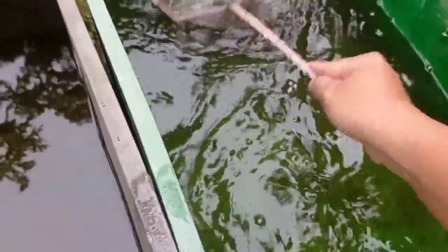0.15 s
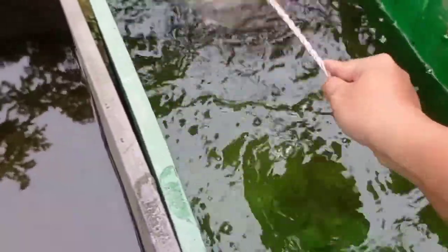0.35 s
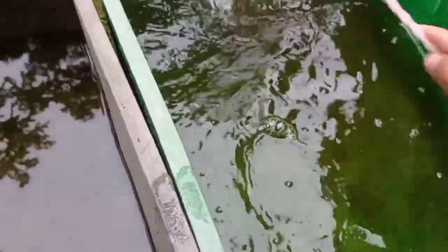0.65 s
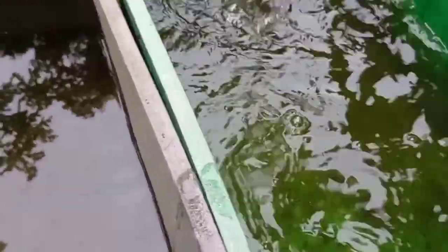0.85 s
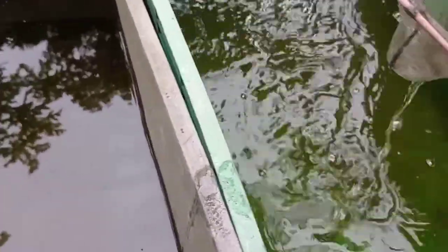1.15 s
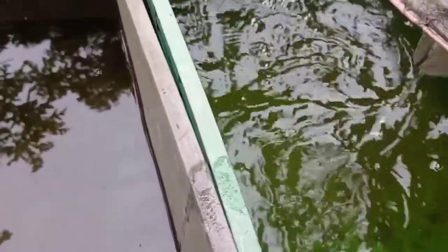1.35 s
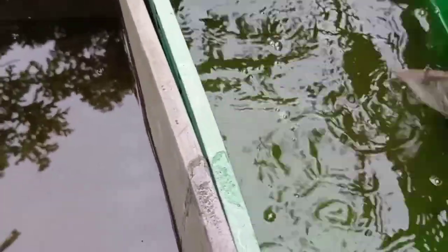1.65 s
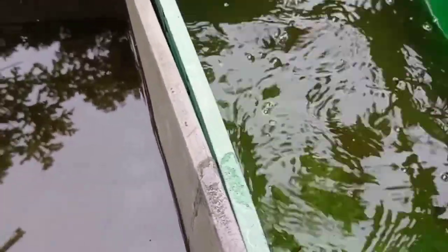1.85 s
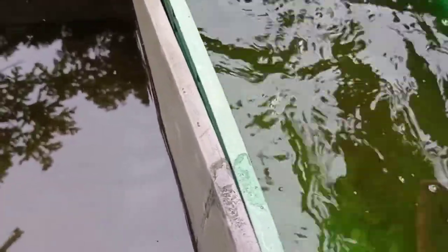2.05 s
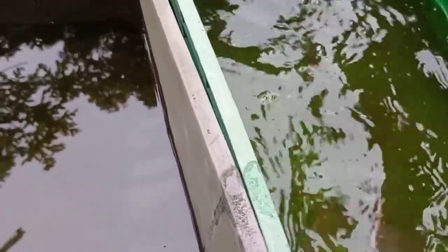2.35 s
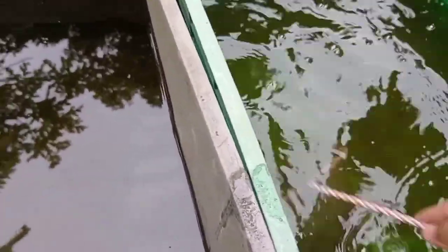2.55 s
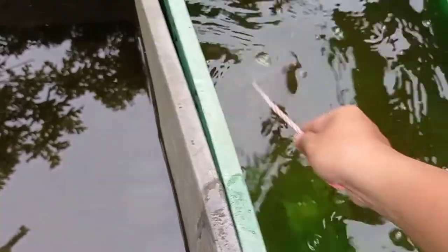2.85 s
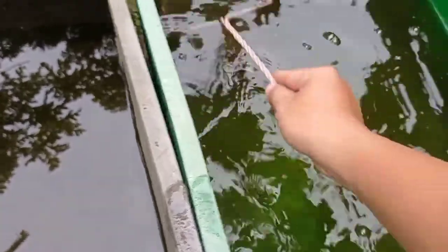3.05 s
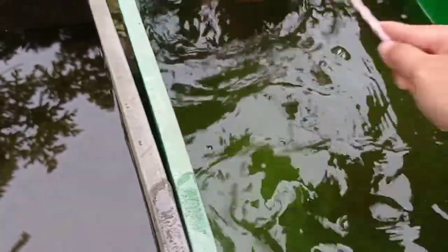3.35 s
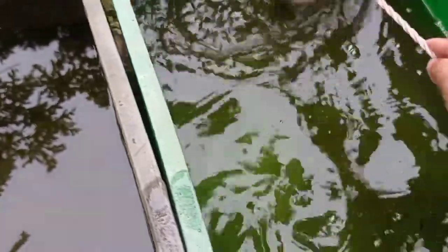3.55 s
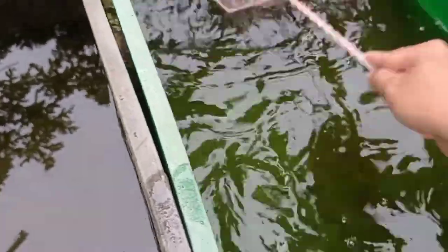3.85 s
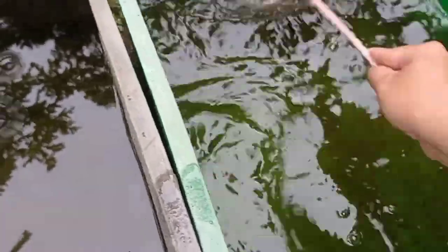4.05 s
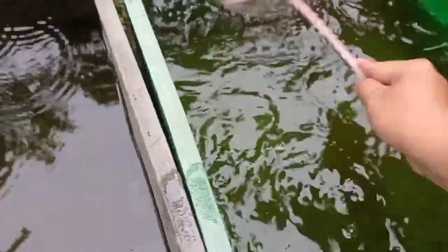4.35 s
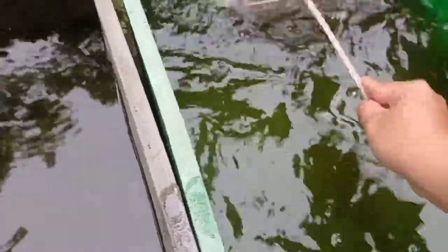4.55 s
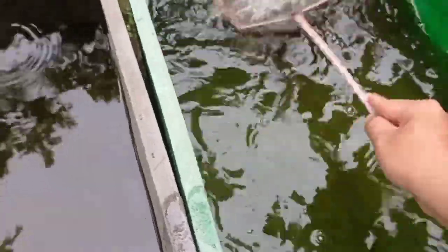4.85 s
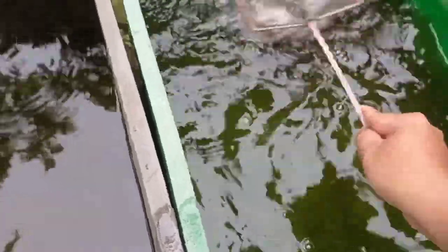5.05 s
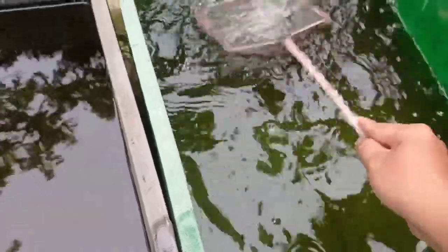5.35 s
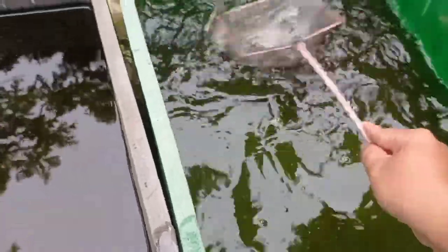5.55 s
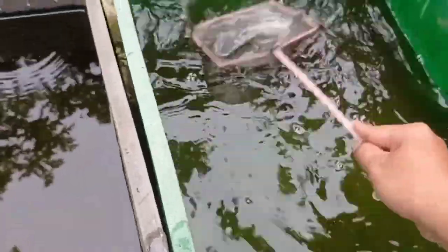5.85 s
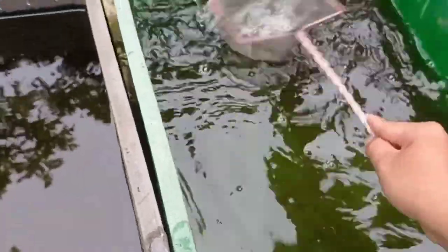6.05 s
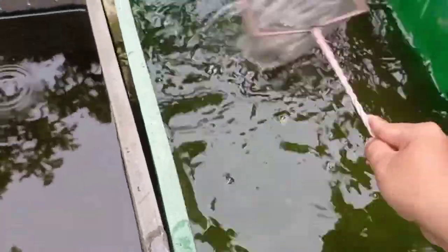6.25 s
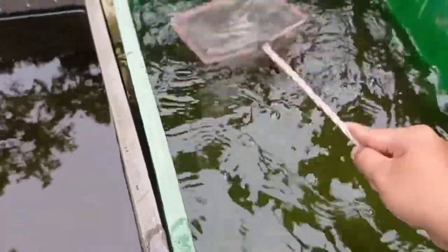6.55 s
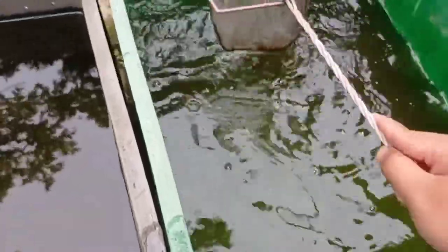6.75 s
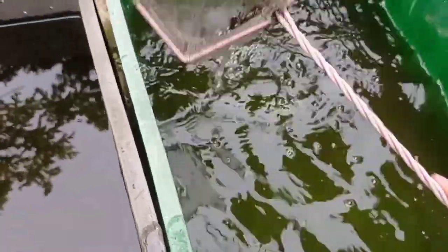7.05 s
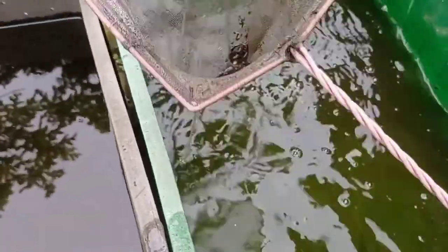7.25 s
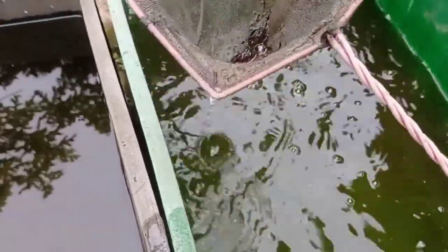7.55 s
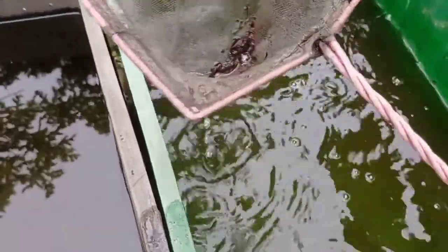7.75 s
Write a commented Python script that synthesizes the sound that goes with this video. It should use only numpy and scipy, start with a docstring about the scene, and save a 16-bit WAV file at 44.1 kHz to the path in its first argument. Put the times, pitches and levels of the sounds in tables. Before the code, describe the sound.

Close mono perspective at an outdoor water tank, with short wall echoes, a very faint open-air tail, and a low wavering machine hum throughout, slightly stronger later. From 0.15 to 0.6 seconds a hand net is shaken in quick, bright splashes with bubbly churn, easing into a soft swish near 0.7. A smaller splash at 1.0 leaves scattered high plinks and drips until 1.6. At 1.8 a deep hollow plop comes with a little splash, another plop near 2.07, then dark, soft slosh as the net slides under until 2.9. Low bloops at 3.0 lead to a near-calm with a thin swell of hiss. From 3.7 to 6.7 vigorous shaking makes about six splashes a second, spray fizzing over gurgling bubbles. It stops quickly; ticks and trickle thin out, with clear drips around 7.2, 7.4 and 7.55 and a rounded plink at 7.85.

```python
"""Hand net in an outdoor tank

At a water tank outdoors, close perspective, mono microphone: a hand net is swished, dipped again, shaken
about six times a second and lifted out. Noise and ringing grains make the spray and splashes; bubbles with
climbing pitch make the churn and plinking drops; bubbles in noise make the slosh, bands of noise the swishes.
Short echoes and a faint outdoor tail follow, over a low machine hum and a faint hiss that swells once.
"""
import sys
import numpy as np
from scipy import signal
from scipy.fft import rfft, irfft, next_fast_len
from scipy.io import wavfile
from scipy.ndimage import map_coordinates

SR = 44100
rng = np.random.default_rng(int(sys.argv[2]) if len(sys.argv) > 2 else 0)


def unload_wav(signal):
    """Save mono or channel-first audio to the path in sys.argv[1] as 16-bit WAV at rate SR, clipped to [-1, 1]."""
    wavfile.write(
        sys.argv[1],
        SR,
        np.round(np.clip(np.atleast_2d(signal).T, -1, 1) * 32767).astype(np.int16),
    )


N = 349272
TIME = np.arange(N) / SR
CUTOFF_HZ = 15700

# Slow swell of the machine hum: (time [s], relative level [dB])
HUM_SWELL = [(0.0, -52.5), (0.77, -53.5), (3.4, -51), (3.93, -49), (5.45, -49), (6.51, -46.5), (7.92, -47)]
# Colours of the layers, each: (frequency [Hz], relative gain [dB])
HUM_COLOUR = [(25, -28), (45, -20.5), (60, -10.5), (80, -1), (110, 2.5), (150, -1), (185, -2), (220, -1),
              (265, -12), (320, -15), (370, -13.5), (420, -17.5), (475, -26), (560, -28), (680, -31.5),
              (900, -32.5), (1150, -40.5), (1600, -39.5), (2200, -47.5), (4000, -75)]
HISS_COLOUR = [(400, -6), (900, 1), (1300, -11), (2200, 1), (2900, 2), (3500, 4.5), (4100, -6), (5600, 7),
               (7500, 4), (9500, -9), (11500, -25), (13500, -27), (15300, -10), (16000, -42)]
SPRAY_COLOUR = [(710, -8.5), (1200, -4), (1430, -10), (1570, 1), (1930, -5), (2830, 2), (3220, -1),
                (3950, -2.5), (5470, -5.5), (6440, -0.5), (11900, -27), (13600, -32), (15000, -15),
                (16000, -47)]
CHURN_COLOUR = [(350, -33), (550, -4.5), (800, 2.5), (1100, -1), (1600, -0.5), (2400, 3), (3500, -53)]
SLOSH_COLOUR = [(200, 1), (320, 7), (550, -7), (850, 2.5), (1300, -5.5), (1900, -5.5), (2500, -10),
                (3000, -9.5), (4000, -14), (6800, -21), (9000, -31), (13000, -54)]
HISS_SWELL_COLOUR = [(1200, -56), (2200, -2), (3000, -21), (4200, 1), (5000, 5), (5300, -5), (5750, 10),
                     (6500, 2.5), (8500, -10), (12000, -25), (16000, -26)]
# Droning tones within the hum: (frequency [Hz], waver rate [1/s], level against the rumble [dB])
DRONES = [(123.6, 7, -6.5), (144.8, 5, -8), (161, 5, -8.5), (191.6, 9, -8), (293, 5, -21.5),
          (335, 6, -25.5), (402.7, 7, -23.5)]
# Faint hiss behind everything: (time [s], level [dB])
HISS_COURSE = [(0, -85), (0.06, -63), (0.14, -65), (1.2, -69.5), (1.55, -74.5), (1.7, -72), (1.9, -73),
               (2.03, -71), (2.3, -75.5), (2.8, -75.5), (3.05, -65.5), (3.28, -78), (3.5, -68.5),
               (3.65, -66.5), (6.9, -72), (7.3, -74), (7.75, -80)]
# Sheets of water thrown by the net:
# (time of crest [s], relative level [dB], swell [s], fall [s], pitch of the commonest drops [Hz])
SHEETS = [(0.138, -40.5, 0.0064, 0.0079, 7600), (0.211, -61, 0.0043, 0.018, 2600),
          (0.292, -28, 0.0031, 0.0094, 8000), (0.36, -36, .0034, 0.017, 6640),
          (0.456, -28, 0.011, 0.012, 4520), (0.923, -47, 0.016, 0.021, 2020),
          (1.016, -47.5, 0.02, 0.0098, 3180), (1.039, -34.5, 0.0024, 0.0075, 5200),
          (1.802, -41.5, 0.0078, .008, 5800), (1.818, -40.5, 0.0084, 0.0078, 4240),
          (1.902, -50, 0.00068, 0.012, 3300), (2.46, -50.5, 0.024, 0.046, 5300),
          (3.408, -54, 0.013, 0.023, 7140), (3.73, -35.5, 0.013, 0.0093, 6600),
          (3.773, -40.5, 0.0046, 0.011, 2900), (3.823, -34.5, 0.0012, 0.014, 4900),
          (4.005, -28, 0.007, 0.0051, 5360), (4.126, -39.5, 0.0025, 0.052, 2870),
          (4.311, -35, 0.0026, 0.023, 3880), (4.385, -29.5, 0.0027, 0.0012, 4600),
          (4.48, -36, 0.029, 0.0038, 3000), (4.58, -37.5, 0.0086, 0.0068, 3070),
          (4.638, -31.5, 0.017, 0.0079, 4700), (4.805, -26, 0.0044, 0.0037, 5830),
          (4.957, -32, 0.02, 0.024, 4650), (5.138, -30.5, 0.0024, 0.0023, 3730),
          (5.214, -70, 0.0027, .005, 2400), (5.3, -33.5, 0.0031, 0.006, 5630),
          (5.405, -34, 0.0022, .013, 5240), (5.482, -27, 0.0065, 0.0048, 6900),
          (5.592, -37.5, 0.023, 0.018, 2300), (5.646, -31, 0.0069, 0.016, 5060),
          (5.763, -34.5, 0.003, 0.0044, 3200), (5.833, -27, 0.003, 0.0067, 5170),
          (5.992, -27.5, 0.004, 0.011, 5500), (6.065, -45, 0.013, 0.042, 3200),
          (6.173, -39, .011, 0.013, 6040), (6.259, -44, 0.027, 0.014, 1750),
          (6.346, -34, 0.012, 0.0036, 4860), (6.437, -48, 0.011, .012, 3220),
          (6.512, -37.5, 0.014, 0.017, 5370), (6.611, -46, 0.023, 0.02, 2380),
          (6.681, -36, 0.014, 0.021, 5900)]
# Bouts of shaking: (start [s], end [s], relative spray level [dB], relative churn level [dB], churn decay [dB/s])
BOUTS = [(0.145, 0.604, -58, -58.5, 36.5), (3.828, 6.735, -58, -58.5, 42)]
# The loudest drops and their bubbles: (time [s], peak level [dB], pitch [Hz], ring [s], slap level [dB])
LOUD_DROPS = [(0.288, -37, 1050, 0.0032, -36), (0.289, -39.5, 1820, 0.0027, -45),
              (0.318, -39, 2980, 0.0049, -52), (0.354, -39, 2300, 0.003, -40),
              (0.383, -36, 1670, 0.0033, -43), (0.469, -39, 1895, 0.0069, -46),
              (0.514, -37.5, 838, 0.017, -39), (0.514, -40.5, 1340, 0.0061, -38),
              (0.992, -46, 4270, .004, -65), (1.008, -49, 1506, 0.024, -35),
              (1.034, -45.5, 1280, 0.0037, -34), (1.04, -41, 4040, .002, -36),
              (1.074, -49, 2660, 0.0063, -56), (1.1, -36, 5700, 0.0013, -63), (1.088, -51, 3490, .005, -57),
              (1.119, -51, 7300, .003, -53), (1.159, -55, 2630, 0.0025, -58),
              (1.143, -30, 6280, 0.0012, -66), (1.168, -49, 3700, 0.0049, -59),
              (1.256, -50, 10200, 0.0012, -60), (1.272, -80, 6000, 0.0062, -33),
              (1.308, -52, 2090, 0.0053, -53), (1.313, -41, 2160, 0.0071, -31),
              (1.32, -47, 8100, .0015, -58), (1.342, -50, 4100, 0.011, -41), (1.36, -41, 6330, 0.0044, -50),
              (1.412, -41.5, 1037, 0.0066, -42), (1.414, -43, 1450, 0.0048, -61),
              (1.403, -51, 7600, .0015, -64), (1.432, -56, 7400, .002, -48), (1.461, -46, 5120, .002, -56),
              (1.465, -48, 7000, .002, -40), (1.465, -44, 2260, 0.006, -42),
              (1.49, -38.5, 2770, 0.0048, -49), (1.512, -56, 2300, 0.005, -58),
              (1.556, -45, 5280, 0.003, -62), (1.577, -45.5, 5430, 0.0035, -69),
              (1.795, -45, 3420, 0.0026, -39), (1.82, -29.5, 855, 0.0045, -55),
              (1.8212, -19.5, 244, 0.006, -50), (1.83, -21.5, 188, 0.015, -48),
              (1.838, -48, 4150, .003, -62), (1.852, -41, 192, 0.017, -58), (1.902, -43, 2960, 0.0035, -48),
              (1.945, -53.5, 3250, .005, -49), (1.961, -57, 3700, 0.0018, -61),
              (1.968, -53, 5800, 0.0018, -67), (1.934, -42.5, 654, 0.0056, -62),
              (1.937, -37, 293, 0.007, -29), (2.06, -43, 3080, 0.0035, -55),
              (2.064, -33, 2130, 0.0025, -38), (2.066, -29, 870, 0.0044, -46),
              (2.067, -37, 279, 0.018, -39), (2.099, -45, 2310, 0.012, -53), (2.365, -50, 890, 0.0035, -46),
              (2.366, -51, 2000, .004, -52), (2.825, -43, 301, 0.016, -70), (2.856, -40, 314, 0.016, -47),
              (3.003, -24, 169.5, 0.0025, -66), (3.018, -27, 234, 0.0028, -52),
              (3.643, -41, 6540, 0.0011, -69), (3.669, -49, 7750, 0.0033, -55),
              (3.726, -35, 6560, 0.0061, -59), (3.728, -51, 945, 0.0083, -52),
              (3.753, -48, 936, 0.016, -31), (3.769, -39.5, 917, 0.011, -28),
              (3.819, -33.5, 5180, 0.0013, -31), (3.827, -41.5, 2525, 0.02, -27),
              (3.878, -33.5, 1146, 0.0079, -33), (3.934, -52, 1050, .005, -31),
              (3.994, -38.5, 930, 0.0093, -51), (4.01, -39, 2100, .005, -55), (4.051, -41, 2680, .005, -57),
              (4.12, -41.5, 980, 0.0086, -29), (4.175, -42, 1020, 0.0038, -33),
              (4.207, -42.5, 817, 0.016, -53), (4.234, -46, 970, 0.0097, -52),
              (4.359, -44, 824, 0.013, -32), (4.395, -39.5, 1244, 0.018, -37),
              (4.432, -35.5, 2750, 0.0044, -36), (4.651, -18.5, 2660, 0.00044, -43),
              (4.695, -41, 1670, 0.0058, -64), (4.804, -24, 5460, .0012, -54),
              (4.862, -45, 740, 0.0072, -56), (4.937, -31.5, 1900, 0.0024, -32),
              (5.043, -31.5, 737, 0.0025, -30), (5.066, -53, 930, .006, -28),
              (5.419, -42, 3300, 0.0043, -40), (5.709, -31.5, 1080, 0.0042, -38),
              (5.836, -39, 1530, 0.0053, -58), (6.673, -35, 1520, 0.0043, -28.5),
              (6.674, -42.5, 960, 0.0055, -53), (7.168, -43, 2300, 0.005, -57),
              (7.184, -44.5, 1525, 0.0067, -47), (7.218, -49.5, 6420, 0.0042, -71),
              (7.244, -42.5, 1110, 0.0075, -62), (7.256, -37, 3020, 0.0021, -55),
              (7.4, -36.5, 2920, 0.0057, -47), (7.428, -54, 3460, 0.0037, -47),
              (7.548, -32, 3160, 0.0018, -62), (7.548, -34.5, 2110, 0.0028, -27.5),
              (7.561, -35.5, 823, 0.0055, -36), (7.562, -42, 3200, 0.0017, -46),
              (7.586, -57, 1500, 0.0064, -40), (7.637, -43.5, 3200, 0.002, -65),
              (7.641, -54, 4200, 0.0032, -63), (7.847, -27.5, 871, 0.026, -64),
              (7.848, -50, 4900, 0.003, -64), (7.864, -53.5, 6350, 0.0041, -71)]
# Pushes of the net under the surface: (time of crest [s], relative level [dB], swell [s], fall [s])
NET_PUSHES = [(0.39, -52, 0.012, 0.019), (1.04, -53, 0.0023, 0.013), (1.941, -71, 0.0036, 0.016),
              (2.075, -71, 0.0045, 0.035), (2.165, -48.5, 0.024, 0.01), (2.362, -50, 0.0012, 0.054),
              (2.5, -47, 0.041, 0.045), (2.728, -50, 0.059, 0.068), (2.86, -54.5, 0.058, 0.037),
              (2.913, -55.5, 0.0043, 0.015)]
# Soft swishes and faint narrow bands of hiss:
# (time of crest [s], level [dB], swell [s], fall [s], centre pitch [Hz], width [octaves])
NOISE_BANDS = [(0.546, -56, .012, .018, 1120, 0.49), (0.689, -52.5, .066, 0.042, 1050, 0.43),
               (0.83, -57, .012, 0.0098, 980, 0.45), (1.759, -76.5, 0.044, 0.018, 2320, .1),
               (1.811, -60, .0042, .03, 1480, 0.71), (1.85, -65, .01, .03, 2780, 0.28),
               (1.912, -65, 0.021, .012, 1520, .25), (1.993, -64, .005, 0.015, 5300, 0.29),
               (2.026, -70, 0.0076, 0.022, 3620, 0.14), (2.09, -60, .01, 0.02, 880, 0.62),
               (2.2, -69.5, .12, 0.075, 3640, .1), (2.22, -79, .06, 0.073, 5100, 0.1),
               (2.462, -41, 0.0012, 0.004, 5700, 0.52), (2.5, -67, .035, .03, 1780, 0.51),
               (2.615, -57.5, 0.0065, 0.025, 2650, 0.66), (2.683, -50.5, 0.018, 0.017, 3100, 0.43),
               (2.914, -68.5, 0.0055, 0.0061, 4900, 0.14), (3.05, -67, 0.12, 0.099, 2220, 0.17),
               (3.08, -72.5, .08, 0.11, 1230, .3), (3.082, -75, 0.043, 0.077, 3600, 0.44),
               (3.25, -85, 0.11, 0.13, 5040, .05), (3.3, -74, .12, 0.18, 5860, .09),
               (3.369, -75, 0.012, 0.026, 2900, 0.15), (3.4, -70, 0.023, .1, 2200, .4),
               (3.44, -68, .025, 0.12, 950, 0.54), (3.58, -67, .02, 0.056, 915, 0.42),
               (3.95, -53.5, 0.054, 0.071, 960, 0.61), (4.2, -58, 0.045, 0.031, 950, 0.44)]


def from_db(db):
    """Decibels to gain."""
    return 10 ** (np.asarray(db) / 20)


def rms_one(x):
    """Scale to unit rms."""
    return x / np.sqrt(np.mean(x ** 2) + 1e-20)


def at_hz(points, hz):
    """Gain of a colour at the given frequencies, interpolated over log frequency."""
    points = np.array(points)
    return from_db(np.interp(np.log(hz + 1e-9), np.log(points[:, 0]), points[:, 1]))


def coloured(x, colour):
    """Filter a steady texture by a colour; rms 1."""
    size = next_fast_len(N)
    gain = at_hz(colour, np.fft.rfftfreq(size, 1 / SR))
    return rms_one(irfft(rfft(x, size) * gain, size)[:N])


def band(x, low_hz, high_hz):
    """Gentle band-pass, kept below the cutoff."""
    high_hz = min(high_hz, CUTOFF_HZ)
    edges = [min(low_hz, high_hz / 2 ** .5), high_hz]
    return signal.sosfilt(signal.butter(2, edges, "band", fs=SR, output="sos"), x)


def drift(rate):
    """Random wavering of rms 1, with `rate` new values a second."""
    knots = rng.standard_normal(4000)
    return rms_one(np.interp(TIME * rate, np.arange(len(knots)), knots))


def add(out, s, sound):
    """Mix a short sound in at time s."""
    at = int(np.clip(round(s * SR), 0, N - 1))
    out[at:at + len(sound)] += sound[:N - at]


def crest(t, swell_s, fall_s):
    """An envelope that swells to 1 at t = 0 and falls away."""
    return np.exp(-np.abs(t) / np.where(t < 0, swell_s, fall_s))


def held(start_s, end_s, rise_s, fade_db_per_s):
    """An envelope that rises up to the start, holds to the end, and fades."""
    rise = np.exp(np.minimum(TIME - start_s, 0) / rise_s)
    return rise * from_db(-fade_db_per_s * np.maximum(TIME - end_s, 0))


def bubble(hz, ring_s, glide, speedup=3.94, burst_octaves=0.85):
    """A trapped air bubble rings; its pitch climbs ever faster as it nears the surface, where it bursts."""
    t = np.arange(int(3.5 * ring_s * SR) + 2) / SR
    climb = np.minimum(glide * t * (1 + speedup * glide * t), 2)  # octaves
    cycles = np.cumsum(np.minimum(hz * 2 ** climb, CUTOFF_HZ)) / SR
    onset = np.minimum(2 * cycles, 1)
    alive = np.exp(-(climb / burst_octaves) ** 8)
    return np.sin(2 * np.pi * cycles) * onset * np.exp(-t / ring_s) * alive


def bubble_cloud(low_hz, high_hz, cycles, rise, spread_db, count):
    """Bubbles of many sizes, born at random; each climbs in pitch while it rings, by `rise` octaves or so."""
    out = np.zeros(N)
    for when, radius, strength, damping, depth in rng.random((count, 5)):
        hz = low_hz * (high_hz / low_hz) ** radius
        ring_s = cycles * (.5 + damping) / hz
        size_db = spread_db * min(-np.log(1 - strength), 3)
        ring = bubble(hz, ring_s, 2 * depth * rise / ring_s)
        add(out, when * N / SR, hz * from_db(size_db) * ring)
    return rms_one(out)


def droplets(per_s, spread_db, cycles, count=26):
    """Countless tiny drops of uneven size, each ringing a few cycles at one of `count` pitches."""
    sizes = from_db(spread_db * np.minimum(rng.exponential(1, N), 4)) * rng.choice([-1, 1], N)
    clicks = sizes * (rng.random(N) < per_s / SR)
    dealt, out = rng.integers(0, count, N), np.zeros(N)
    for k, hz in enumerate(np.geomspace(1200, 15500, count)):
        r, w = np.exp(-hz / (cycles * SR)), 2 * np.pi * hz / SR  # pole radius and angle
        struck = clicks * (dealt == k) + 1e-18
        ring = signal.lfilter([0, np.sin(w), -np.sin(w)], [1, -2 * r * np.cos(w), r * r], struck)
        out += np.sqrt(hz) * hz * ring / np.sin(w / 2)
    return rms_one(out)


def hum(bass_hz=75, overtone_hz=300, bass_follows=0.22, overtones_follow=2.28, waver_db=0.68):
    """A rumbling machine with wavering tones; it brightens as it swells, while its deepest part barely changes."""
    rumble = coloured(rng.standard_normal(N), HUM_COLOUR)
    for hz, waver_per_s, tone_db in DRONES:
        phase = 2 * np.pi * hz * TIME
        tone = drift(waver_per_s) * np.cos(phase) + drift(waver_per_s) * np.sin(phase)
        rumble += from_db(tone_db) * tone
    rumble = rms_one(rumble)
    bass = signal.sosfiltfilt(signal.butter(2, bass_hz, fs=SR, output="sos"), rumble)
    overtones = signal.sosfiltfilt(signal.butter(2, overtone_hz, "high", fs=SR, output="sos"), rumble)
    middle = rumble - bass - overtones
    level_db = np.interp(TIME, *np.transpose(HUM_SWELL))
    swell = from_db(level_db - level_db.mean() + waver_db * drift(2.943))
    parts = bass * swell ** bass_follows + middle * swell + overtones * swell ** overtones_follow
    return from_db(level_db.mean() + 2.0) * parts


def hiss(patchy_db=4.5, shifts_per_s=6, count=52):
    """A faint hiss whose colour wavers: each narrow band swells and fades on its own."""
    edges, white = np.geomspace(700, 15500, count + 1), rng.standard_normal((2, N))
    patches = np.zeros(N)
    for k, (low_hz, high_hz) in enumerate(zip(edges, edges[1:])):
        # neighbouring bands take different noise
        patches += band(white[k % 2], low_hz, high_hz) * from_db(patchy_db * drift(shifts_per_s))
    return from_db(np.interp(TIME, *np.transpose(HISS_COURSE))) * coloured(patches, HISS_COLOUR)


def splashes(width=1.19):
    """Each stroke throws a sheet of water that swells and breaks into drops, most of them of one size."""
    texture = droplets(per_s=7000, spread_db=5.5, cycles=3.6) + from_db(-7.0) * rng.standard_normal(N)
    burst = coloured(texture, SPRAY_COLOUR)
    out, t = np.zeros(N), np.arange(-SR // 8, SR // 4) / SR
    for s, level_db, swell_s, fall_s, hz in SHEETS:
        grains = burst[rng.integers(N - len(t)):][:len(t)]
        grains = grains + band(grains, hz / width, hz * width)  # favour the commonest drops
        force = crest(t, swell_s, fall_s)
        sheet = force * grains
        evened = sheet * np.linalg.norm(force) / np.linalg.norm(sheet)
        add(out, s + t[0], from_db(level_db - 6.5) * evened)
    return out


def wash(lag_s=0.0075, surge_db=5.5, surge_s=0.0041, backswing_s=0.0772):
    """Spray and churn levels [dB]: held through each bout, surging with strokes and backswings, then settling."""
    rise_s = 0.012  # the water is stirred up at once
    settle_db_per_s = 60  # and the spray settles when the shaking stops
    trickle_db, trickle_fade_db_per_s = -24, 7  # leaving a trickle from the mesh
    spray_gain, churn_gain, surge = 1e-6, 1e-6, np.zeros(N)
    for start_s, end_s, spray_db, churn_db, dying_db_per_s in BOUTS:
        trickle = from_db(trickle_db) * held(start_s, end_s, rise_s, trickle_fade_db_per_s)
        shaken = held(start_s, end_s, rise_s, settle_db_per_s)
        spray_gain += from_db(spray_db) * np.maximum(shaken, trickle)
        churn_gain += from_db(churn_db) * held(start_s, end_s, rise_s, dying_db_per_s)
    t = np.arange(-SR // 8, SR // 4) / SR
    swing = np.exp(-(t / surge_s) ** 2) + np.exp(-((t - backswing_s) / surge_s) ** 2)
    for s, *_ in SHEETS:
        add(surge, s + lag_s + t[0], swing)
    lift_db = surge_db * np.minimum(surge, 1)
    return 20 * np.log10(spray_gain) + lift_db, 20 * np.log10(churn_gain) + lift_db


def spray(spray_db):
    """Water strains through the mesh: a dense patter of short droplet grains over a fine fizz."""
    patter = droplets(per_s=3600, spread_db=4.0, cycles=5.5)
    fizz = from_db(-6) * rng.standard_normal(N)
    return from_db(spray_db + 3.0 + 2.25 * drift(60)) * coloured(patter + fizz, SPRAY_COLOUR)


def churn(churn_db):
    """Air dragged under by the net gurgles: a dense cloud of quickly damped bubbles, a few ringing on upward."""
    cloud = bubble_cloud(low_hz=620, high_hz=2800, cycles=7.5, rise=.05, spread_db=4.4, count=4500)
    plops = bubble_cloud(low_hz=750, high_hz=2600, cycles=10.5, rise=.07, spread_db=3.2, count=620)
    gurgle = cloud + from_db(-2) * plops + from_db(-15) * rng.standard_normal(N)
    return from_db(churn_db - 1.0) * coloured(gurgle, CHURN_COLOUR)


def climb_rate(hz):
    """Starting climb of a drop's bubble [octaves/s]: small ones hold their pitch, large deep ones rise slowly."""
    return 11.0 * (hz / 850) ** -0.6 * min(hz / 970, 1) ** 2.0


def drops(slap_s=0.00096, slap_rise_s=0.001, slap_span=2.63):
    """A drop slaps the surface, from its bubble's pitch upward; the bubble rings, wobbling, in a brief spatter."""
    wobble, wobble_cycles = .25, 8  # share of the ring's level, and cycles between random turns
    spatter_db, spatter_s = -16, .006  # against the ring's peak; longest decay
    out, t = np.zeros(N), TIME[:SR // 10]
    for s, peak_db, hz, ring_s, slap_db in LOUD_DROPS:
        ring, knots = bubble(hz, ring_s, climb_rate(hz)), rng.standard_normal(200)
        turns = TIME[:len(ring)] * hz / wobble_cycles
        shape = 1 + wobble * np.minimum(turns, 1) * np.interp(turns, np.arange(len(knots)), knots)
        add(out, s, from_db(peak_db) * ring * shape)

        spatter = rms_one(band(rng.standard_normal(len(t)), .85 * hz, 1.6 * hz))
        spatter_fade = np.exp(-t / min(spatter_s, 2 * ring_s))
        add(out, s, from_db(peak_db + spatter_db) * spatter * spatter_fade)

        fading = np.exp(-t / slap_s) * (1 - np.exp(-t / slap_rise_s))
        slap = band(rng.standard_normal(len(t)) * fading, 0.37 * hz, slap_span * hz)
        slap = band(slap, 1.1 * hz, 1.5 * slap_span * hz)
        add(out, s, from_db(slap_db) * slap * np.linalg.norm(fading) / np.linalg.norm(slap))
    return out


def satellites(below_db=-8, fade_db=12, delay_s=0.032, spread_octaves=1.27, cycles=11, count=4):
    """Each small drop throws up a few smaller ones, which land a moment later at higher pitches."""
    out = np.zeros(N)
    for s, peak_db, hz, _, slap_db in LOUD_DROPS:
        for late, small, glide in rng.random((count, 3)):
            pitch = min(hz * 2 ** (small * spread_octaves), 9000)
            plink = bubble(pitch, min(cycles / pitch, .006), 15 * glide)
            level_db = (peak_db + slap_db) / 2 + below_db - fade_db * late
            if hz > 600:  # large bubbles throw none
                add(out, s + .003 + delay_s * late ** 2, from_db(level_db) * plink)
    return out


def slosh():
    """The net slides under with a darker wash of noise and large, quickly damped bubbles."""
    power = np.zeros(N)
    for s, level_db, swell_s, fall_s in NET_PUSHES:
        power += (from_db(level_db) * crest(TIME - s, swell_s, fall_s)) ** 2
    cloud = bubble_cloud(low_hz=265.5, high_hz=2300, cycles=6.7, rise=0.026, spread_db=-1.0, count=4000)
    water = coloured(cloud + from_db(6) * rng.standard_normal(N), SLOSH_COLOUR)
    return np.sqrt(power) * from_db(1.5 + 0.6 * drift(46.1)) * water


def swishes(spread_db=5.5, sag_per_s=2.2):
    """Soft swishes and faint narrow bands of hiss: bands of noise, narrow to broad, swell and fade."""
    out, t = np.zeros(N), np.arange(-SR // 3, SR // 2) / SR
    for s, level_db, swell_s, fall_s, hz, octaves in NOISE_BANDS:
        width = 2 ** (octaves / 2)
        # the pitch sinks, more for wider bands: sag_per_s times the width each second
        course = np.cumsum(2 ** (-sag_per_s * octaves * t))
        uneven = rng.standard_normal(2 * SR) * from_db(spread_db * rng.standard_normal(2 * SR))
        noise = np.interp(course, np.arange(2 * SR), band(uneven, hz / width, hz * width))
        envelope = crest(t, swell_s, fall_s)
        swish = envelope * noise
        evened = swish * np.linalg.norm(envelope) / np.linalg.norm(swish)
        add(out, s + t[0], from_db(level_db) * evened)
    return out


def stray_drips(quietest_db=-57, range_db=8, cycles=3.8, calming_s=0.45, count=36):
    """After each bout tiny bubbles burst with dry ticks, ever more rarely as the surface calms."""
    out = np.zeros(N)
    for _, end_s, *_ in BOUTS:
        for when, size, strength in rng.random((count, 3)):
            hz, s = 4800 * 2 ** size, end_s - calming_s * np.log(1 - when)
            if s < TIME[-1]:
                add(out, s, from_db(quietest_db + range_db * strength) * bubble(hz, cycles / hz, 8.9))
    return out


def hiss_swell(starts_low=0.085, settle_s=0.13):
    """A thin, smooth swell of the background hiss, whose pitch slides up at first."""
    start_s = 3.06
    envelope = held(start_s, end_s=3.7, rise_s=.09, fade_db_per_s=75)
    pitch = 1 - starts_low * np.exp(-np.maximum(TIME - start_s, 0) / settle_s)
    noise = coloured(rng.standard_normal(N), HISS_SWELL_COLOUR)
    return from_db(-71.5) * envelope * map_coordinates(noise, [np.cumsum(pitch)], order=3)


def tank(x, wall_db=-12, wall_t60=0.029, yard_db=-19, yard_t60=0.38):
    """Quick reflections between the tank walls, then a faint tail from the surroundings."""
    t = TIME[:SR // 2]
    sparse = rng.standard_normal(len(t)) * (rng.random(len(t)) < .03)
    walls = sparse * from_db(-60 * t / wall_t60) * (t > .002)
    yard = rng.standard_normal(len(t)) * from_db(-60 * t / yard_t60) * (t > .01)
    response = from_db(wall_db) * walls / np.linalg.norm(walls)
    response += from_db(yard_db) * yard / np.linalg.norm(yard)
    return x + signal.fftconvolve(x, response)[:N]


def scene():
    """The water sounds and a swell of hiss, with echoes stronger on the drops, over the hum and hiss."""
    spray_db, churn_db = wash()
    stirred = spray(spray_db) + churn(churn_db) + splashes() + slosh()
    smooth = swishes() + hiss_swell()
    dripping = drops() + satellites() + stray_drips()
    echoing = tank(stirred + smooth) + tank(dripping, wall_db=-8.5, wall_t60=0.062)
    return (echoing + hum() + hiss())[None]


def record(dry):
    """One microphone channel, its top cut steeply by an elliptic low-pass."""
    return signal.sosfilt(signal.ellip(10, .1, 80, CUTOFF_HZ, fs=SR, output="sos"), dry)


dry = scene()
out = record(dry)
unload_wav(out)
```